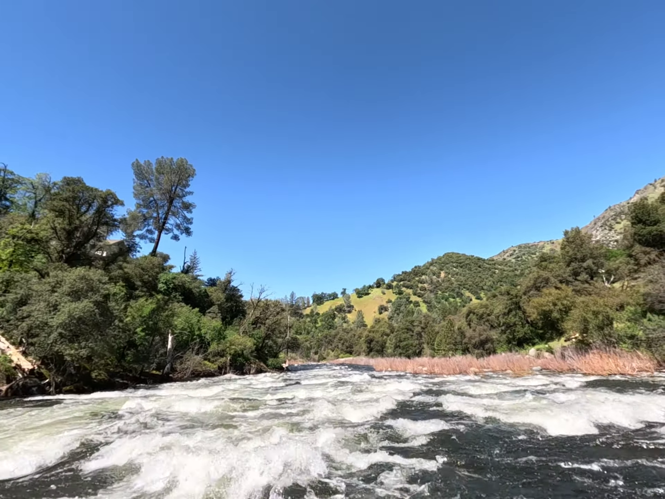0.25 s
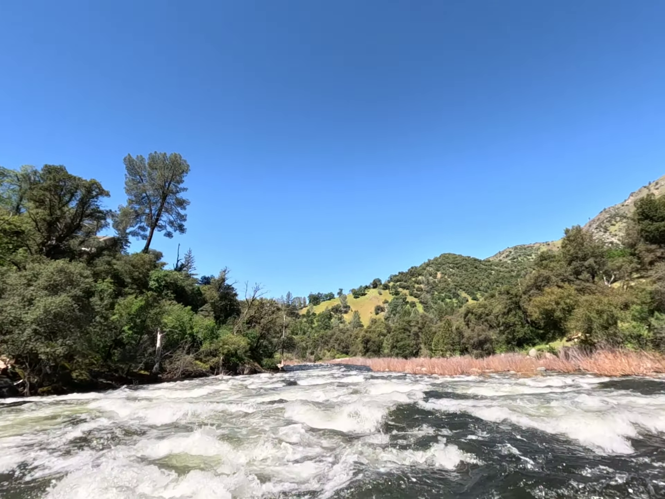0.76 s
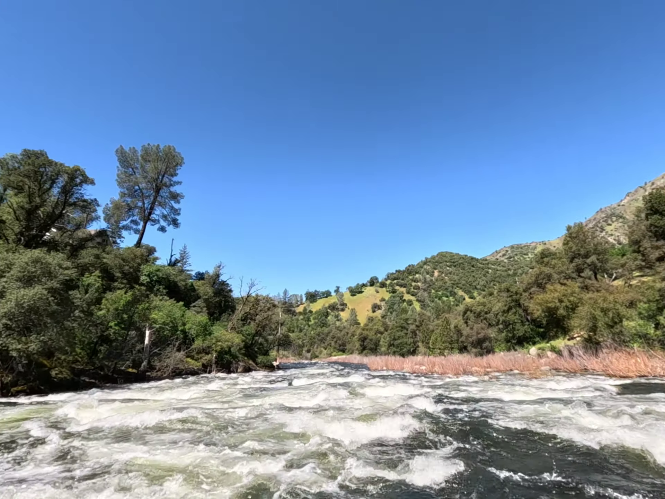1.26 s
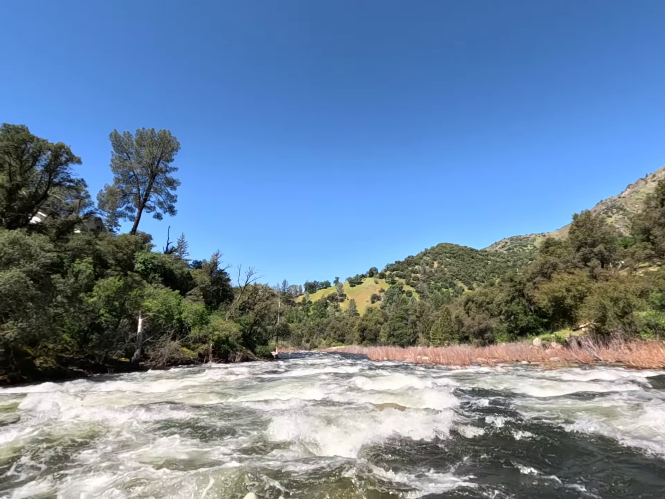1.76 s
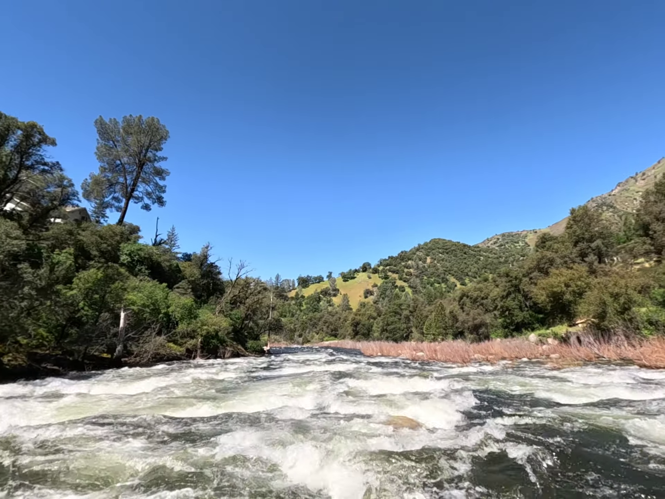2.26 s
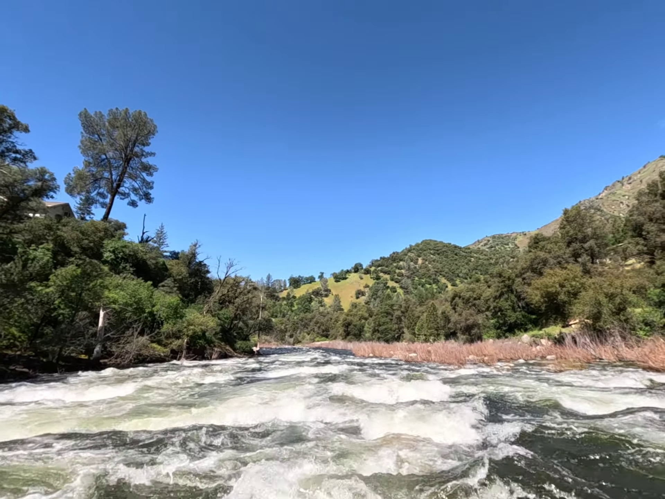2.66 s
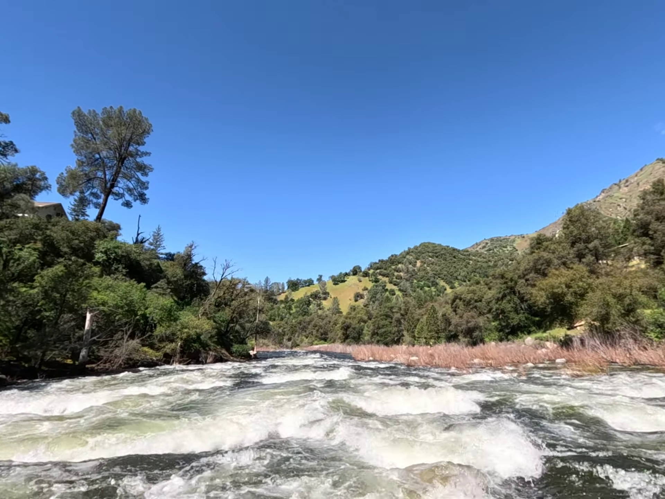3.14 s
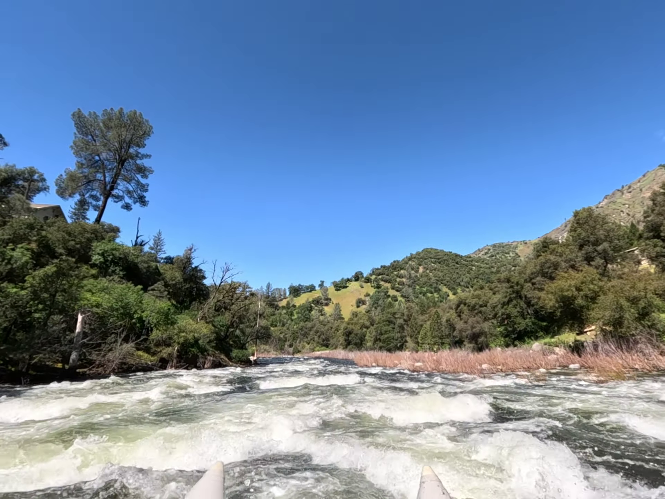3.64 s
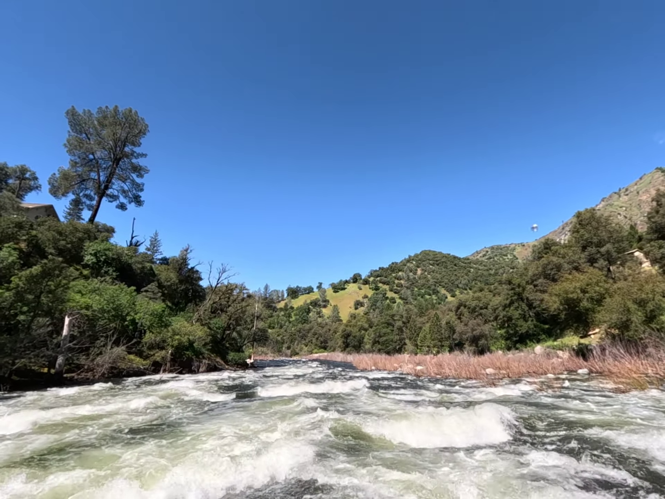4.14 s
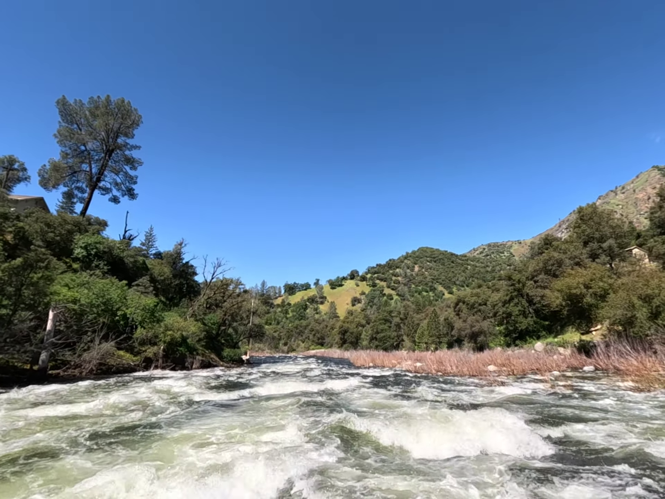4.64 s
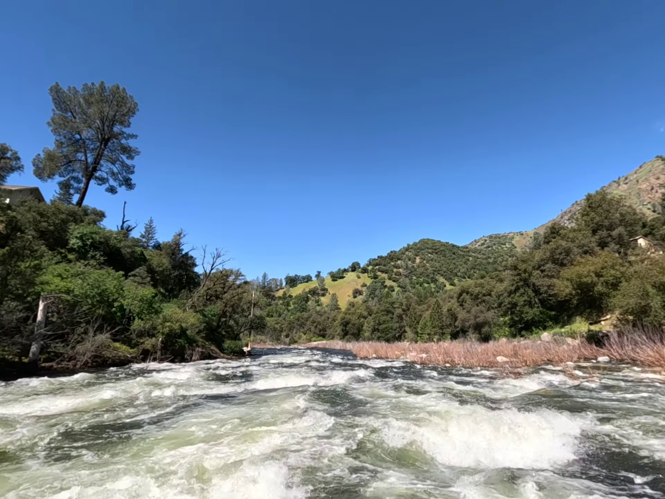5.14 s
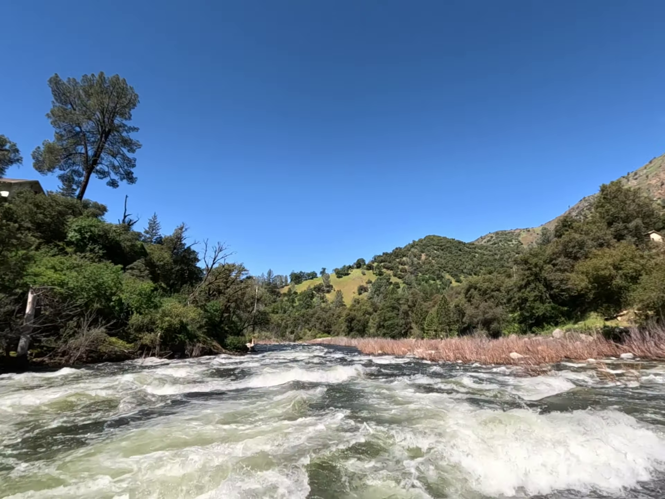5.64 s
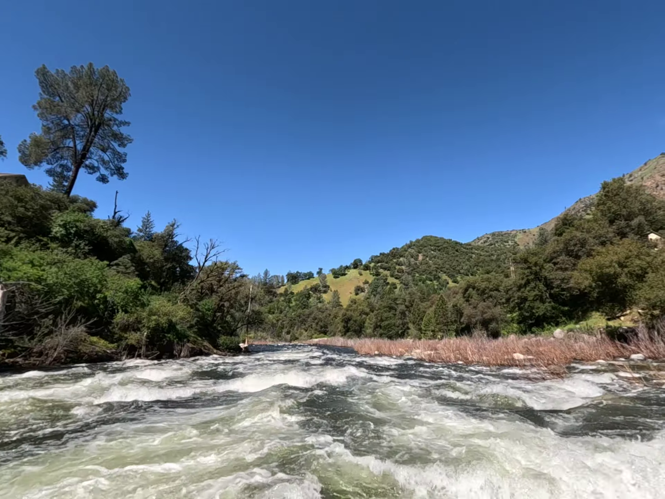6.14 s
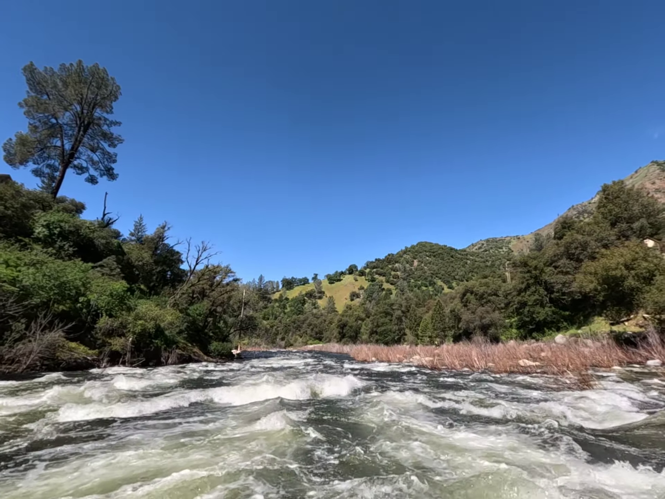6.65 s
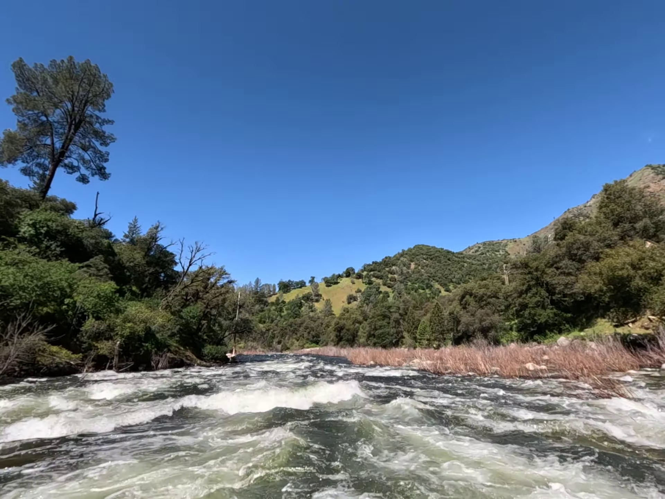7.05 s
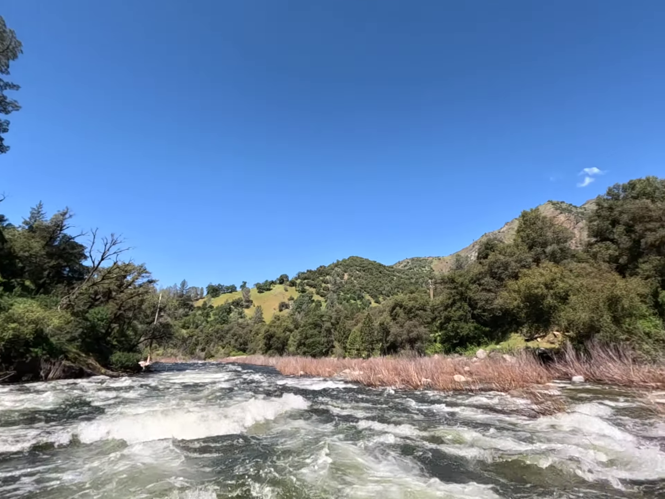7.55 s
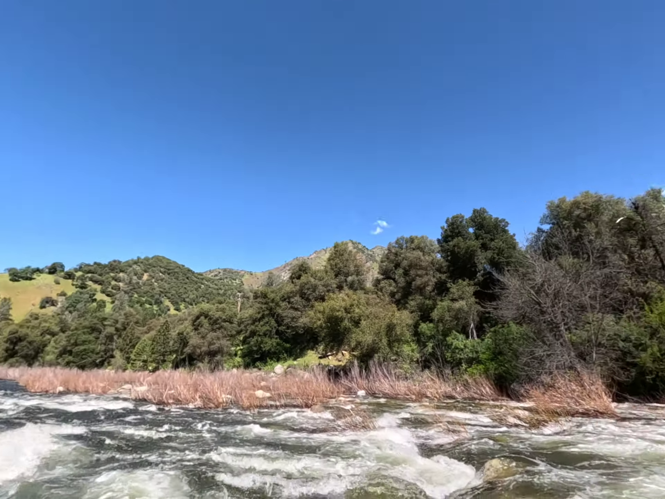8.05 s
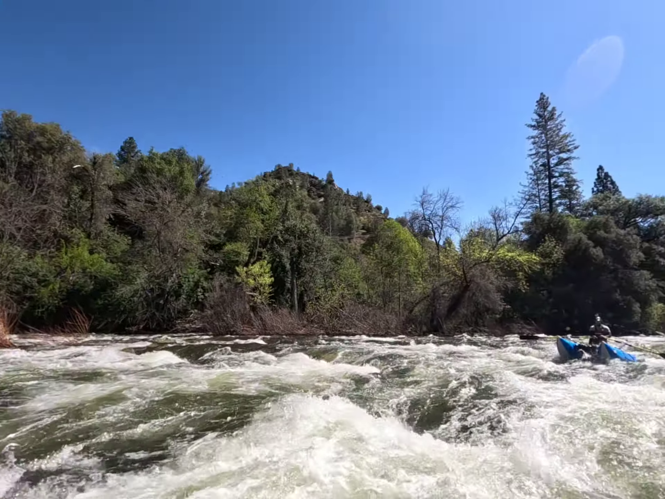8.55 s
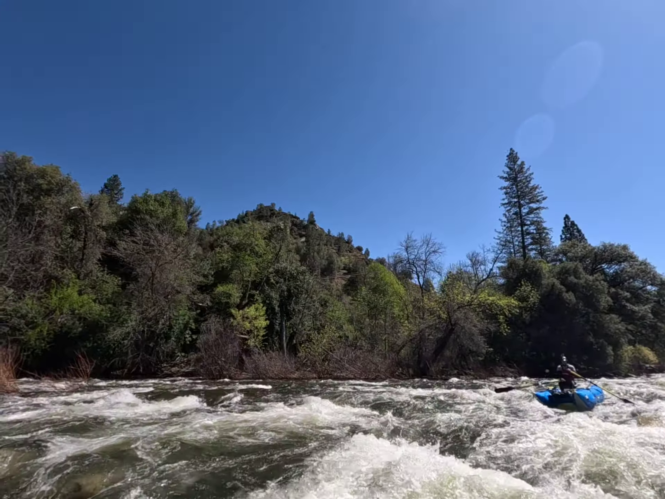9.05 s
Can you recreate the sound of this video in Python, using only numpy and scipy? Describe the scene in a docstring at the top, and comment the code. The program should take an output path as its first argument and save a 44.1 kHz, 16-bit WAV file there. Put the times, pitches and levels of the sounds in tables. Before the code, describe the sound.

Dense whitewater roar close around a raft, churning and foaming, with watery gulps, soft thuds and low wind buffeting, muffled as through a wet case.

```python
"""On a raft in a river rapid: whitewater heard through a wet, waterproof camera case.
Deep water roars, and breaking waves churn, foam and spray: noise mixed with ringing bubbles, shaped by
the case, which rings near 900, 1700 and 4500 Hz. Air pockets gulp as rising sines, thuds are short swells
of low noise and spatters are clusters of ticks. Wind buffets the case as lumpy low noise.
A thin band of high noise hisses in the right channel only."""
import sys
import numpy as np
from scipy import signal
from scipy.fft import rfft, irfft
from scipy.io import wavfile
from scipy.ndimage import uniform_filter1d

SR = 44100
rng = np.random.default_rng(int(sys.argv[2]) if len(sys.argv) > 2 else 0)


def output_pcm(signal):
    """Save a mono or channel-first signal as 16-bit PCM at the path in sys.argv[1].

    Samples are clipped to [-1, 1] before scaling.
    """
    pcm = np.clip(np.atleast_2d(signal).T, -1, 1) * 32767
    wavfile.write(sys.argv[1], SR, np.round(pcm).astype(np.int16))


N = 410130  # length [samples]
TIME = np.arange(N) / SR  # [s]
BINS = np.maximum(np.arange(N // 2 + 1) * SR / N, 1)  # spectrum frequencies [Hz], kept above zero


def from_db(db):
    """Decibels to amplitude gain."""
    return 10 ** (np.asarray(db) / 20)


def rms_one(x):
    """Scale to unit power."""
    return x / np.sqrt(np.mean(x ** 2) + 1e-20)


def in_time(rows):
    """Draw a level curve [dB] sample by sample, straight between its points."""
    return np.interp(TIME, *np.transpose(rows))


def coloured(x, spectrum):
    """Filter x with a spectrum drawn on a log-frequency axis."""
    hz, db = np.transpose(spectrum)
    gain = from_db(np.interp(np.log(BINS), np.log(hz), db))
    return irfft(rfft(x) * gain, N)


def drift(rate_hz):
    """Slow random motion of unit power: noise that weakens above the given rate."""
    noise = rng.standard_normal(N)
    return rms_one(irfft(rfft(noise) / (1 + (BINS / rate_hz) ** 2), N))


def steady(x, seconds):
    """Even out the power over windows of this length; faster grain stays."""
    power = uniform_filter1d(x ** 2, max(int(seconds * SR), 1))
    return x / np.sqrt(power + 1e-12)


def bandpassed(x, low_hz, high_hz):
    """Keep one band of x with gentle slopes."""
    return signal.sosfilt(signal.butter(2, [low_hz, high_hz], "band", fs=SR, output="sos"), x)


def ring(clicks, hz, t60):
    """Two-pole resonator: each click sets off a sine that falls 60 dB in t60 seconds."""
    radius = from_db(-60 / (t60 * SR))
    angle = 2 * np.pi * hz / SR
    feedback = [1, -2 * radius * np.cos(angle), radius * radius]
    return signal.lfilter([0, np.sin(angle)], feedback, clicks + 1e-18)


def bubbles(per_s, size_db, low_hz, high_hz, cycles, count=20):
    """Bubbles born at random, mostly weak; each rings and falls 60 dB in the given cycles."""
    born = np.flatnonzero(rng.random(N) < per_s / SR)
    chance = rng.random((len(born), 3))
    spread = np.minimum(-np.log(1 - chance[:, 0]), 4)
    sizes = from_db(size_db * spread) * np.sign(chance[:, 1] - .5)  # either polarity
    pitch_index = (chance[:, 2] * count).astype(int)
    out = np.zeros(N)
    for k, hz in enumerate(np.geomspace(low_hz, high_hz, count)):
        clicks = np.zeros(N)
        clicks[born] = sizes * (pitch_index == k)
        out += ring(clicks, hz, cycles / hz) * hz / low_hz  # higher bubbles start louder
    return rms_one(out)


# resonances of the case: (frequency [Hz], width [Hz])
CASE_MODES = [(918, 162), (1685, 168), (4500, 220)]


def case(x):
    """Each mode is a mass on a spring: it passes the lows, rings at its pitch and shuts out the highs."""
    response = 1
    for hz, width in CASE_MODES:
        response = response / (1 - (BINS / hz) ** 2 + 1j * BINS * width / hz ** 2)
    return irfft(rfft(x) * response, N)


def water(spectrum, grains, surge_db, surge_rate):
    """Near bubbles over the noise blur of countless far ones, surging and heard through the case."""
    blur = rng.standard_normal(N)
    rush = (blur + grains) * from_db(surge_db * drift(surge_rate))
    return steady(case(coloured(rush, spectrum)), seconds=.3)


# level of the hiss before its gain: (time [s], level [dB])
HISS_LEVEL = [(0, -60.9), (0.4, -62.2), (2.4, -61.8), (3.9, -59.9), (4.4, -61), (5.5, -58.5), (6.8, -60.9),
              (7.9, -66.0), (8.5, -64.3), (9.3, -67.2)]
# tone of the hiss: (frequency [Hz], level [dB])
HISS_TONE = [(5000, -39.5), (6800, -39), (8000, -51), (10450, -51), (10750, -26.5), (11400, -11.5),
             (11850, -2), (12200, -1), (13000, -4), (14200, -9), (15500, -15)]


def hiss(gain_db, flicker_db):
    """A thin band of high noise with a slight random flicker in level."""
    level_db = in_time(HISS_LEVEL) + gain_db
    flicker = flicker_db * drift(60)
    return from_db(level_db + flicker) * rms_one(coloured(rng.standard_normal(N), HISS_TONE))


# gusts on top of the breeze, before the lumps: (time of peak [s], length [s], level at peak [dB])
WIND_GUSTS = [(.46, 0.58, -35.5), (.97, .42, -34.5), (2.13, 0.27, -38.5), (2.7, 0.24, -36.5),
              (3.14, .4, -37), (4.3, 0.28, -37.5), (5.85, 0.96, -43), (6.28, .2, -37), (6.75, 0.94, -39.5),
              (7.55, .7, -39), (8.45, 0.65, -34.5), (9.12, .35, -41)]
# tone of the wind: (frequency [Hz], level [dB])
WIND_TONE = [(4, 5.5), (18, 3.5), (38, 2), (55, -3), (75, -6.5), (150, -30.5), (1200, -90)]


def wind(breeze_db, lump_db, lump_rate):
    """Lumpy pressure on the case: a steady breeze, and gusts that rise and fall as smooth bells."""
    power = from_db(breeze_db) ** 2
    for peak_s, length, db in WIND_GUSTS:
        bell = np.cos(np.pi * np.clip((TIME - peak_s) / length, -.5, .5))
        power = power + (from_db(db) * bell) ** 2
    lumps = from_db(lump_db * drift(lump_rate))
    rumble = steady(coloured(rng.standard_normal(N), WIND_TONE), seconds=0.2)
    return np.sqrt(power) * lumps * rumble


# level of the fine spray before its gain: (time [s], level [dB])
SPRAY_LEVEL = [(0, -84.6), (1.85, -83.1), (2.5, -86.2), (3.4, -85.3), (4.15, -82.0), (4.5, -83.5),
               (6.4, -83.5), (7, -86.7), (7.6, -83.9), (9.3, -88.6)]
# tone of the spray before the case: (frequency [Hz], level [dB])
SPRAY_TONE = [(2000, -25.5), (2900, -6), (3400, 4.5), (4000, 0.5), (4450, -4), (5000, 2.5), (6200, 9),
              (8000, 11.5), (10000, 0.5)]


def spray(gain_db):
    """Fine spray: bright noise grained with tiny ringing bubbles."""
    tiny = from_db(-4.0) * bubbles(per_s=1800, size_db=1.5, low_hz=2850, high_hz=7000, cycles=22)
    level = from_db(in_time(SPRAY_LEVEL) + gain_db)
    return level * water(SPRAY_TONE, tiny, surge_db=0.5, surge_rate=12)


# drops spattering on the case: (time of peak [s], level [dB])
SPATTER_HITS = [(1.994, -83), (3.092, -81), (6.426, -86)]


def spatters(length_s, drops_per_s, low_hz, high_hz):
    """Each spatter is a brief bell-shaped cluster of tiny ticks."""
    drops = (rng.random(N) < drops_per_s / SR) * rng.standard_normal(N)
    ticks = rms_one(bandpassed(drops + 1e-18, low_hz, high_hz))
    return ticks * sum(from_db(db) * np.exp(-((TIME - s) / length_s) ** 2) for s, db in SPATTER_HITS)


# dull blows, before gain and case: (time of onset [s], level [dB])
THUD_HITS = [(1.741, -23), (2.679, -31), (3.166, -29), (4.317, -28), (6.269, -30.5), (8.161, -30)]


def thuds(swell_s, top_hz, gain_db):
    """Soft blows of water on the raft: short swells of low noise, heard through the case."""
    low = bandpassed(rng.standard_normal(N), 40, top_hz)
    force = np.zeros(N)
    for s, db in THUD_HITS:
        age = np.maximum(TIME - s, 0) / swell_s
        force += from_db(db + gain_db) * age * np.exp(1 - age)
    return case(steady(low, seconds=0.047) * force)


# air pockets closing nearby, before gain: (time of onset [s], level at peak [dB])
GULP_HITS = [(1.266, -16.5), (1.995, -9.5), (2.647, -14), (2.712, -13), (3.086, -12), (3.462, -15),
             (4.747, -10.5), (5.479, -12.5), (5.764, -15), (6.194, -12), (6.426, -12.5), (6.61, -12),
             (7.568, -14), (7.76, -18)]


def gulps(pitch_hz, rise, swell_s, gain_db):
    """A large bubble swells and quickly dies, its pitch rising as it nears the surface."""
    out = np.zeros(N)
    detunes = rng.normal(0, .035, len(GULP_HITS))
    for (s, db), detune in zip(GULP_HITS, detunes):
        at = int(s * SR)
        age = TIME[:min(SR // 20, N - at)]
        # rise is the fraction of the starting pitch gained per second
        phase = 2 * np.pi * pitch_hz * (1 + detune) * (age + rise * age ** 2 / 2)
        shape = (age / swell_s * np.exp(1 - age / swell_s)) ** 2  # peaks at swell_s
        out[at:at + len(age)] += from_db(db + gain_db) * shape * np.sin(phase)
    return out


# the deep roar before its gain, strongest past the middle: (time [s], level [dB])
ROAR_LEVEL = [(0, -43), (0.9, -43.2), (1.8, -40), (2.3, -41.5), (5.5, -39), (6.8, -39.1), (7.3, -40.5),
              (9.3, -43.5)]
# tone of the roar before the case: (frequency [Hz], level [dB])
ROAR_TONE = [(30, -14.5), (75, -4.5), (130, -1.5), (270, -1), (315, -3), (355, -7.5), (410, -5.5),
             (560, -13.5), (900, -27.5), (2000, -55)]


def roar(gain_db):
    """Deep water: low surging noise with no single bubbles standing out."""
    level = from_db(in_time(ROAR_LEVEL) + gain_db)
    return level * water(ROAR_TONE, 0, surge_db=1.1, surge_rate=7.1)


# breaking waves swelling and fading as the raft passes them: (time [s], level [dB])
WAVE_LEVEL = [(0, -34), (0.6, -34.4), (1.2, -33), (1.9, -31.0), (2.25, -32.0), (2.7, -30.5), (3.5, -32),
              (4.1, -31), (5.05, -32.5), (6.25, -29.5), (7.3, -31.9), (8.4, -33.5), (9.3, -33.5)]


def waves():
    """The swell [dB] that drives foam and churn alike."""
    return in_time(WAVE_LEVEL)


# tone of the foam before the case: (frequency [Hz], level [dB])
FOAM_TONE = [(700, -28.5), (1150, -5), (1450, -1), (1700, -0.5), (2000, -6.5), (2500, -9.5), (3000, -11.5),
             (4000, -26), (6000, -31)]


def foam(waves_db, gain_db, follow):
    """Splashing foam: noise and small bubbles, swinging `follow` times as far in dB as the waves."""
    small = from_db(-3.5) * bubbles(per_s=3000, size_db=1.0, low_hz=1264, high_hz=3130, cycles=16)
    froth_db = waves_db.mean() + follow * (waves_db - waves_db.mean())
    return from_db(froth_db + gain_db) * water(FOAM_TONE, small, surge_db=0.52, surge_rate=12)


# tone of the churn before the case: (frequency [Hz], level [dB])
CHURN_TONE = [(200, -19), (400, -2), (580, 2), (750, 0), (950, 0.5), (1150, -2), (1400, -7.5),
              (1900, -22.5), (3000, -42.5)]


def churn(waves_db, gain_db):
    """The body of the breaking waves: noise thick with large ringing bubbles."""
    large = from_db(-5.0) * bubbles(per_s=1200, size_db=1.0, low_hz=504.5, high_hz=1409, cycles=23.6)
    return from_db(waves_db + gain_db) * water(CHURN_TONE, large, surge_db=0.2, surge_rate=9)


def scene():
    """River and wind reach both channels alike; the hiss joins on the right."""
    waves_db = waves()
    river = wind(breeze_db=-42, lump_db=1.0, lump_rate=6)
    river = river + spray(gain_db=6.5)
    river = river + spatters(length_s=.013, drops_per_s=1500, low_hz=4000, high_hz=7500)
    river = river + thuds(swell_s=0.015, top_hz=210, gain_db=-9.5)
    river = river + gulps(pitch_hz=914, rise=4.4, swell_s=0.0038, gain_db=-7.0)
    river = river + roar(gain_db=1.64)
    river = river + foam(waves_db, gain_db=-10.5, follow=1.1)
    river = river + churn(waves_db, gain_db=0.45)
    return np.array([river, river + hiss(gain_db=7, flicker_db=.5)])


def record(dry):
    """A steep low-pass removes the top above 15.5 kHz."""
    cutoff_hz = 15500
    low_pass = signal.ellip(12, .05, 90, cutoff_hz, fs=SR, output="sos")
    return signal.sosfilt(low_pass, dry)


dry = scene()
out = record(dry)
output_pcm(out)
```